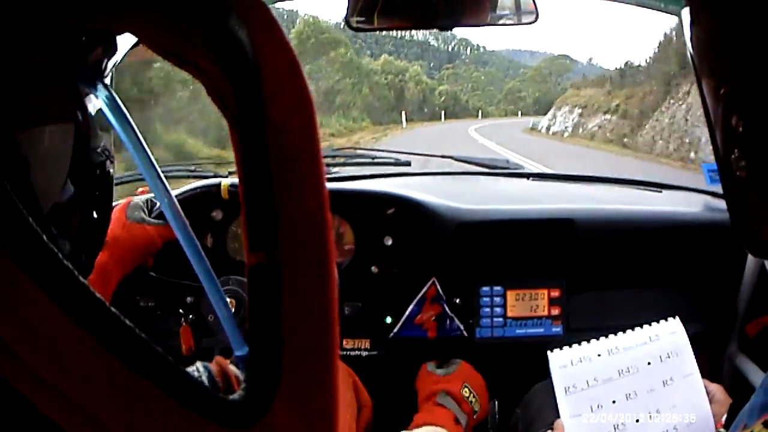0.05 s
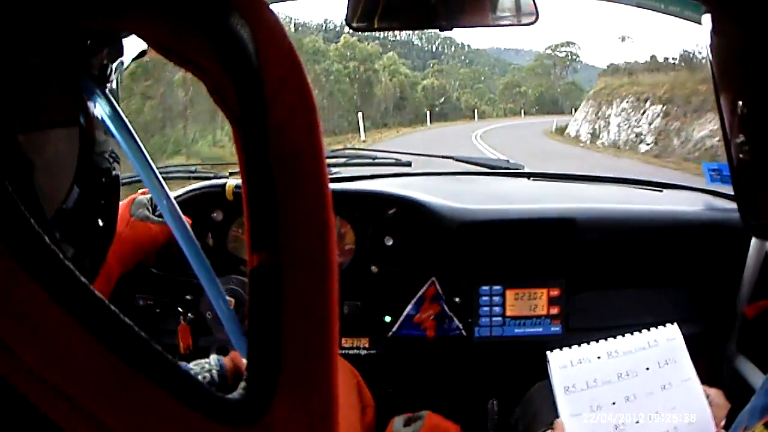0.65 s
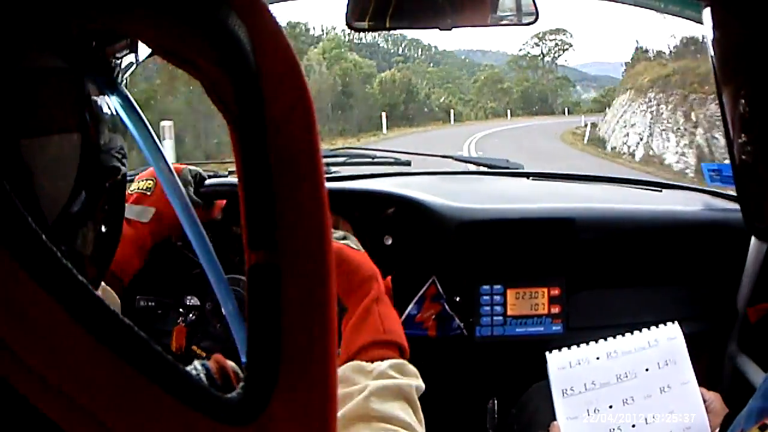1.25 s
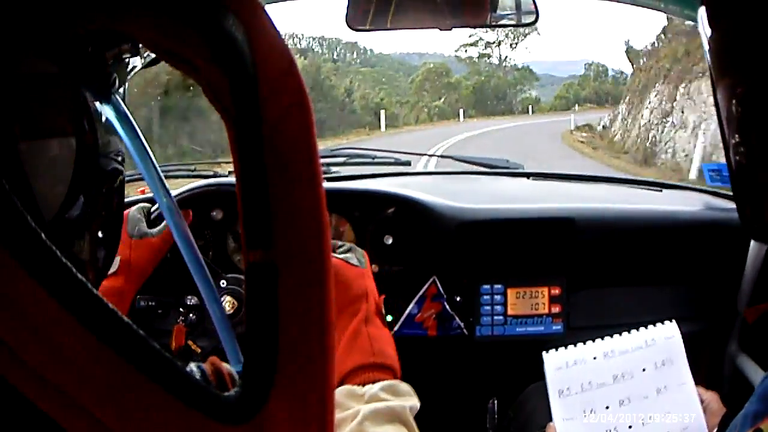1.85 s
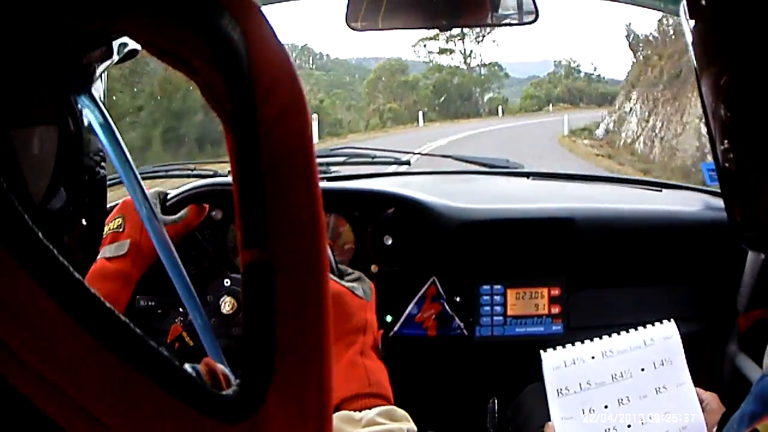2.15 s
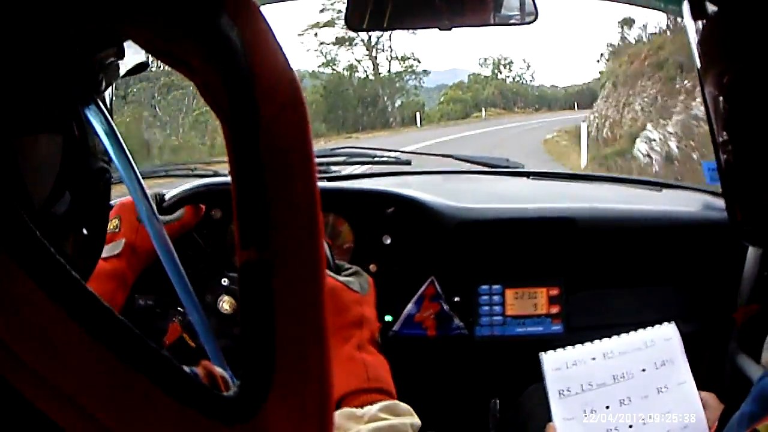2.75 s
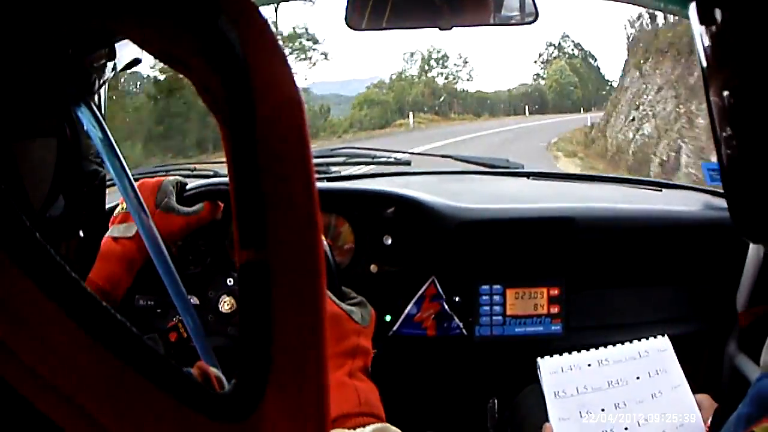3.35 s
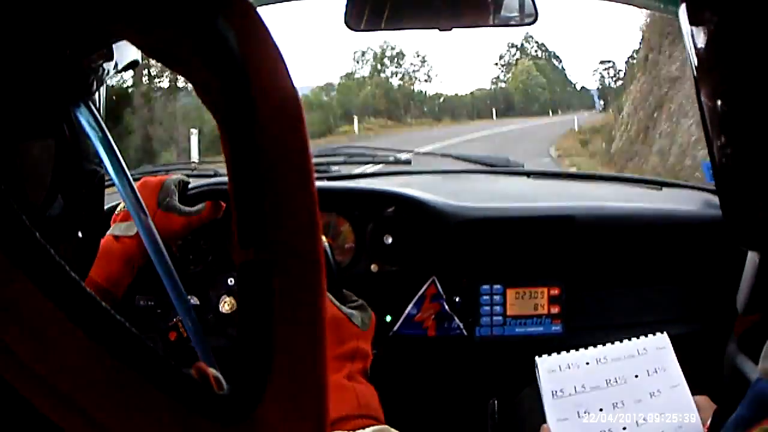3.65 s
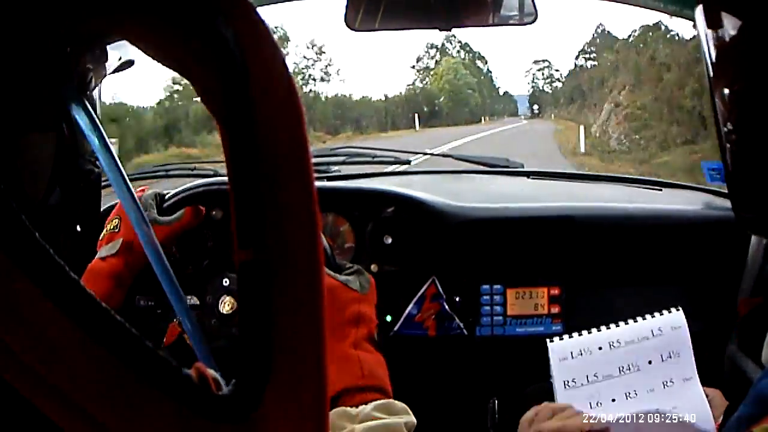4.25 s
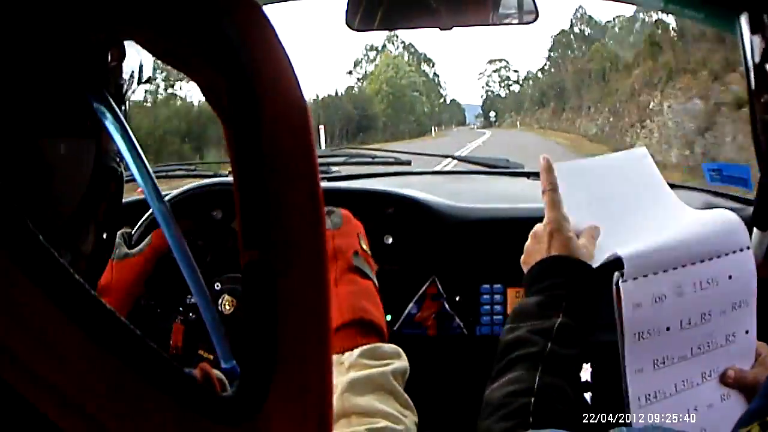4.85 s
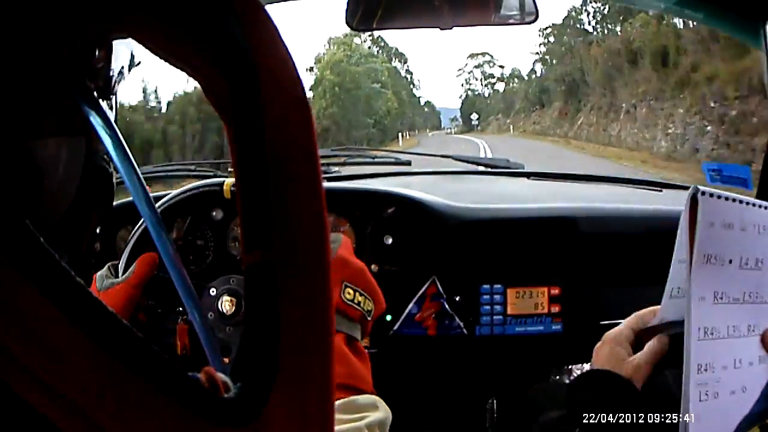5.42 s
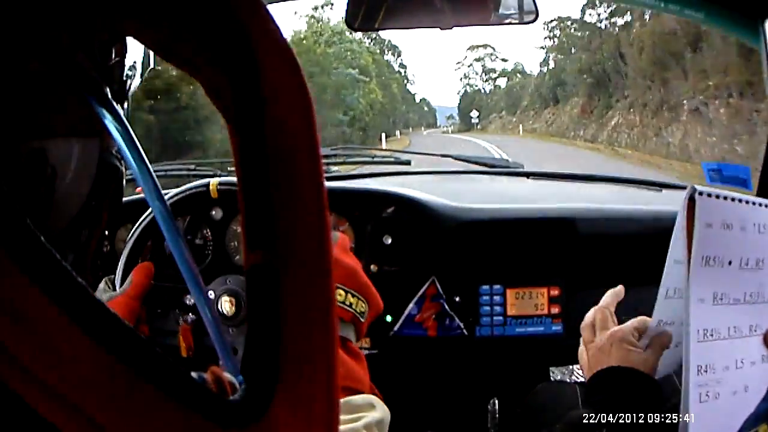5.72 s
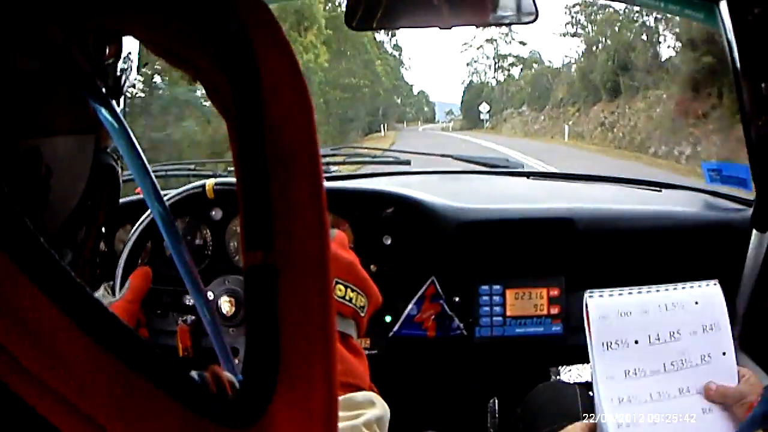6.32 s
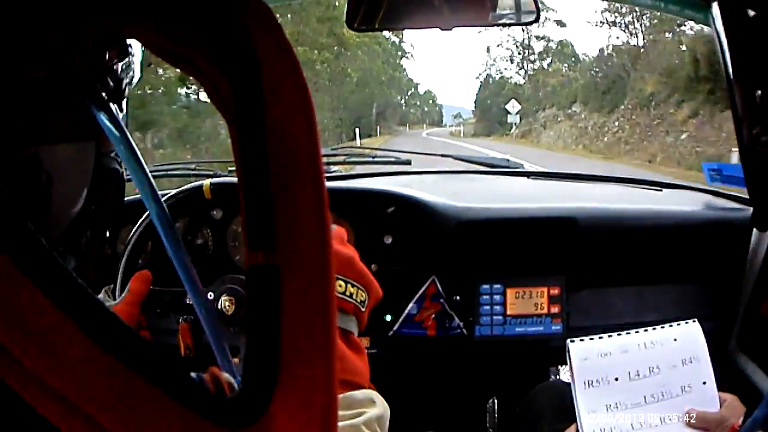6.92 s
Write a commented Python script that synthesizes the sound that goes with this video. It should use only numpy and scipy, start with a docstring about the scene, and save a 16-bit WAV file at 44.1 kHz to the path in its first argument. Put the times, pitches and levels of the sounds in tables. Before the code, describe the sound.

Wind buffets an overloaded microphone in rasping gusts and pops over the dull drone of a rally car, heard from inside.

```python
"""Short rasping gusts and lone pops sputter as buffeting air overloads a small camera's microphone.
Its diaphragm saturates, swinging from stop to stop, and turbulence crackles on each swing.
Between the gusts, low and dull, comes the cabin of a flat-six rally car pulling at speed:
two cylinder banks fire in turn to make a drone, something loose rattles, and the road rumbles."""
import sys
import numpy as np
from scipy import signal
from scipy.fft import rfft, irfft
from scipy.io import wavfile

SR = 44100
rng = np.random.default_rng(int(sys.argv[2]) if len(sys.argv) > 2 else 0)


def wav_out(sig):
    """Save sig, one row per channel (or a flat mono array), as 16-bit PCM at SR to the path in sys.argv[1]."""
    wavfile.write(sys.argv[1], SR, np.round(np.clip(np.atleast_2d(sig).T, -1, 1) * 32767).astype(np.int16))


N = 307818
T = np.arange(N) / SR

# The strongest gusts. Each row: start in seconds, length in seconds, strength in dB.
STRONG_GUSTS = [(0.001, 0.17, -19.5), (0.25, 0.034, -20.5), (0.299, 0.064, -19.5), (0.703, 0.014, -25.5),
                (0.83, 0.037, -23), (0.923, 0.03135, -18.5), (0.964, 0.024, -19.5), (1.026, 0.023, -18.5),
                (1.099, 0.0564, -28.5), (1.265, 0.0667, -19.5), (1.393, 0.046, -19.5), (1.65, 0.05, -21),
                (1.78, 0.021, -18.5), (1.873, 0.05, -20.5), (1.933, 0.035, -19), (2.108, 0.029, -19),
                (2.172, 0.028, -25), (2.227, 0.034, -20), (2.334, 0.03, -20), (2.518, 0.03196, -20),
                (2.657, 0.0718, -23), (2.774, 0.089, -20.5), (2.896, 0.084, -20.5), (3.001, 0.052, -24.5),
                (3.157, 0.018, -21.5), (3.198, 0.035, -23), (3.316, 0.049, -16.5), (3.377, 0.0951, -20.5),
                (3.534, 0.039, -20), (3.808, 0.01485, -19), (3.838, 0.025, -19), (3.87, 0.023, -18.5),
                (3.916, 0.044, -19), (3.988, 0.022, -24.5), (4.045, 0.024, -19.5), (4.126, 0.039, -19.5),
                (4.22, 0.06, -20.5), (4.419, 0.043, -23.5), (4.487, 0.072, -20.5), (4.606, 0.038, -22.5),
                (4.649, 0.025, -20), (4.736, 0.038, -20.5), (4.791, 0.026, -21), (4.864, 0.04, -23),
                (4.943, 0.029, -21.5), (5.073, 0.051, -22), (5.145, 0.031, -24.5), (5.204, 0.035, -27),
                (5.385, 0.03, -17.5), (5.455, 0.17, -19.5), (5.673, 0.021, -20), (5.705, 0.066, -21),
                (5.911, 0.045, -23), (6.096, 0.023, -22), (6.177, 0.029, -19), (6.303, 0.057, -23.5),
                (6.38, 0.064, -19), (6.583, 0.026, -21), (6.62, 0.083, -23.5), (6.727, 0.025, -21.5)]
# Spectra of the air's flutter and its turbulent rasp and hiss. Each row: frequency in Hz, level in dB.
FLUTTER_SPECTRUM = [(25, -3.5), (60, -3.5), (110, 1), (175, -4), (225, 0.5), (350, -6.5), (800, -19.5)]
RASP_SPECTRUM = [(200, -21), (400, -0.5), (650, 3.5), (1000, 3.5), (1200, -1), (1500, -2.5), (2000, -10.5),
                 (3000, -26.5), (5000, -43.5), (11000, -62)]
HISS_SPECTRUM = [(1200, -1), (2500, 9), (3500, 4), (5000, 1), (6500, 2), (8500, -0.5), (11000, -4.5)]


def gusts(pressure, rows, knee=0.53, knee_width=0.1443, ceiling_db=-6, cusp_db=-6,
          rasp_db=-3.5, hiss_db=-16, clump_db=6):
    """Saturation: gusts drive the diaphragm to its stops. Returns its swing and the turbulence on it."""
    spans = [(stretch(start, length), db) for start, length, db in rows]
    flutter, rasp, hiss = noise(FLUTTER_SPECTRUM), noise(RASP_SPECTRUM), noise(HISS_SPECTRUM)
    air, turbulence = np.zeros((2, N))
    for span, strength_db in spans:
        flutter_db = -2.5 + 0.77 * (strength_db + 22)  # stronger gusts flutter more
        air[span] = unit(pressure[span] + undb(flutter_db) * flutter[span])
    air = smooth(air, 0.0034)
    # weak pushes hardly move the diaphragm; it peaks at the knee, and stronger ones pin it a little lower
    pinned = np.tanh((air / knee) ** 3)
    cusp = pinned * np.exp(-np.abs(np.abs(air) - knee) / knee_width)
    swing = smooth(undb(ceiling_db) * pinned + undb(cusp_db) * cusp, 0.0012)
    # turbulence crackles in clumps: hardest at the cusps, faint on the way across
    blowing = smooth(during(rows) * 1., 0.00034)
    clumps = undb(clump_db * walk(0.0062)) * (0.1 + pinned ** 2 + 3 * np.abs(cusp)) * blowing
    hiss_gain = undb(hiss_db + 1.5 * walk(.03))
    for span, strength_db in spans:
        rasping = undb(rasp_db) * unit(clumps[span] * rasp[span])
        hissing = hiss_gain[span] * unit(clumps[span] * hiss[span])
        turbulence[span] = undb(strength_db) * (rasping + hissing)
    return swing, turbulence


# The hardest pops. Each row: time in seconds, relative level of the crack in dB.
HARD_POPS = [(0.206, -14), (0.38, -12), (0.589, -18), (0.708, -6.5), (0.902, -11.5), (1.035, -8),
             (1.061, -10), (1.193, -12.5), (1.289, -6), (1.46, -9.5), (1.594, -10.5), (1.724, -15.5),
             (1.884, -11), (2.116, -15), (2.237, -9), (2.519, -8), (2.572, -8), (2.63, -14), (2.903, -10.5),
             (3.08, -16), (3.16, -9), (3.279, -7.5), (3.316, -3.5), (3.507, -13), (3.582, -11),
             (3.676, -10.5), (3.746, -15.5), (3.811, -15), (3.922, -13), (3.989, -8.5), (4.045, -25.5),
             (4.373, -11), (4.605, -11), (4.708, -12.5), (4.813, -11), (5.003, -10), (5.27, -18.5),
             (5.335, -10.5), (5.891, -10), (5.982, -14), (6.071, -15.5), (6.312, -11)]


def pops(swing, pressure, lesser_pops, peak_db=-2, rasp_db=-9, hiss_db=-22, rise=0.47, fall=0.76):
    """Impulsive overload: jolts pull the diaphragm the way the air leans. Returns swing plus cracks."""
    swing, cracks = swing.copy(), np.zeros(N)
    rasp, hiss = noise(RASP_SPECTRUM), noise(HISS_SPECTRUM)
    for at, crack_db in [(at, db - 6.5) for at, db in HARD_POPS] + lesser_pops:
        scatter = np.exp(0.27 * rng.standard_normal())
        width_ms = 1.73 * 0.69 ** ((crack_db + 30) / 20) * scatter  # harder pops are shorter
        centre = int(np.clip(at * SR, 0, N - 1))
        span = slice(max(centre - 400, 0), centre + 400)
        ms = (T[span] - at) * 1000
        flank_ms = max(width_ms, .3) * np.where(ms < 0, rise, fall)
        pull = np.exp(-(np.abs(ms) / flank_ms) ** 2.03)
        peak = np.sign(pressure[centre]) * undb(peak_db)
        swing[span] += pull * (peak - swing[span])
        burst = np.exp(-np.abs(ms) / (0.77 + 0.34 * width_ms))
        cracks[span] += undb(crack_db + rasp_db) * unit(burst * rasp[span])
        cracks[span] += undb(0.93 * crack_db + hiss_db) * unit(burst * hiss[span])
    return swing + cracks


# The longest lulls, when the air lets go of the diaphragm. Each row: start in seconds, length in seconds.
AIR_LULLS = [(0.215, 0.03), (0.53, 0.036), (0.636, 0.027), (0.775, 0.037), (0.867, 0.031), (0.99, 0.036),
             (1.237, 0.027), (1.85, 0.026), (2.08, 0.028), (2.143, 0.03), (2.599, 0.03), (2.728, 0.036),
             (2.863, 0.034), (3.097, 0.03), (3.234, 0.027), (3.645, 0.029), (4.011, 0.031), (4.287, 0.035),
             (4.344, 0.028), (4.389, 0.029), (4.577, 0.026), (4.671, 0.029), (5.177, 0.028), (5.235, 0.033),
             (6.037, 0.029), (6.119, 0.027)]
# Strength of the chance jolts. Each row: time in seconds, relative level in dB.
JOLT_STRENGTH = [(0, 9.5), (.55, -5.5), (1.1, 4), (2, -3), (2.9, 4.5), (3.6, 1), (4.5, 4), (5.2, 1.5),
                 (5.7, 4.5), (6.3, 2.5), (6.98, -2)]


def sputter(jolts_per_s=68, unevenness=.31, puff_share=.42, in_gust_share=.3, edge_s=.003, rest_s=.004,
            puff_db=-24, pop_db=-24, gust_pop_db=-22.5, puff_spread_db=2.5, pop_spread_db=5):
    """Intermittency: air jolts unevenly. Returns puffs (start, length, dB) and lesser pops (time, dB)."""
    calm, gusty = during(AIR_LULLS), during(STRONG_GUSTS)
    # a hard pop outside a gust drags a short puff with it
    puffs = [(at - edge_s / 2, .009, db - 8.5) for at, db in HARD_POPS if not gusty[int(at * SR)]]
    taken = during([(start - rest_s, length + 2 * rest_s) for start, length, _ in [*puffs, *STRONG_GUSTS]])
    # the air pops as it lets go before a lull, and again as it catches
    edges = [at for start, length in AIR_LULLS for at in (start - edge_s, start + length + edge_s)
             if not taken[int(at * SR)]]
    lesser_pops = [(at, pop_db) for at in edges]
    # the diaphragm snaps back as a gust ends
    lesser_pops += [(start + length - edge_s / 2, db - 5) for start, length, db in STRONG_GUSTS]
    taken |= calm | during([(at - rest_s, 2 * rest_s) for at in edges])
    resting = during([(at - .012, .012) for at, _ in HARD_POPS])  # no jolt just before a hard pop
    draws = zip(rng.standard_normal((600, 2)), rng.random((600, 2)))
    for k, ((shift, size), (kind, duration)) in enumerate(draws):
        at = (k + unevenness * shift) / jolts_per_s
        length = 0.00861 * (.5 + duration)
        start = at - length / 2
        if start < 0 or start + length > T[-1] or resting[stretch(start, length)].any():
            continue
        level_db = np.interp(at, *np.transpose(JOLT_STRENGTH))
        if gusty[int(at * SR)] and kind < in_gust_share:
            lesser_pops.append((at, level_db + gust_pop_db + pop_spread_db * size))
        elif taken[int(at * SR)]:
            continue
        elif kind < puff_share:
            puffs.append((start, length, level_db + puff_db + puff_spread_db * size))
        else:
            lesser_pops.append((at, level_db + pop_db + pop_spread_db * size))
    return puffs, lesser_pops


# Spectrum of the slow buffeting. Each row: frequency in Hz, level in dB.
BUFFET_SPECTRUM = [(5, -13.5), (15, -10.5), (26, 1), (32, 0), (42, -6.5), (70, -24), (200, -41.5)]


def cabin_pressure(boom):
    """Superposition: the cabin air heaves with the buffeting and with the boom of the exhaust."""
    return noise(BUFFET_SPECTRUM) + undb(-3) * boom


# The engine's pull. Each row: time in seconds, firing rate of one bank in Hz, effort in dB.
ENGINE_PULL = [(0, 77.36, -8.5), (.7, 77.34, -14.5), (1.2, 77.63, -4), (1.9, 76, -4), (2.6, 76.35, -11.5),
               (3.101, 77.13, -7.5), (3.601, 77.1, -7), (4.4, 79.58, -8.5), (4.799, 81.05, -1),
               (5.25, 82.7, -5.5), (5.55, 83.8, 1.5), (6.049, 85.16, -5.5), (6.3, 86.52, 2.5),
               (6.98, 90.17, 7)]
# Transmission of the engine into the cabin. Each row: frequency in Hz, gain in dB.
CABIN_RESPONSE = [(110, -5), (160, 17.5), (250, -14.5), (400, 0), (600, -22), (1000, -18.5), (2000, -31),
                  (5000, -37.5)]


def engine(roughness=0.24, far_bank_gain=0.59, cabin_decay_s=0.0055):
    """Periodic excitation: two banks fire in turn. Returns their growl in the cabin and the deep boom."""
    times, bank_hz, effort_db = np.transpose(ENGINE_PULL)
    effort = undb(np.interp(T, times, effort_db))
    rate_hz = np.interp(T, times, bank_hz) * (1 + 0.003024 * walk(0.0802))
    cycles = np.cumsum(rate_hz) / SR
    firing = np.floor(2 * cycles)
    bank_gain = np.where(firing % 2, far_bank_gain, 1)
    pulses = np.diff(firing, prepend=0) * bank_gain * (1 + roughness * walk(0.002))
    # close reflections run the firings together
    reflections = rng.standard_normal(N) * np.exp(-T / cabin_decay_s)
    growl = colour(irfft(rfft(pulses) * rfft(reflections), N), CABIN_RESPONSE)
    return np.sqrt(effort) * growl, effort * np.cos(2 * np.pi * cycles)


# Brief rattles. Each row: time of the peak in seconds, half-width in seconds, level in dB.
RATTLE_BURSTS = [(0.315, 0.015, -20.5), (0.707, 0.0047, -24.5), (1.065, 0.0048, -28), (1.308, 0.016, -26.5),
                 (5.647, 0.0036, -22.5), (6.107, 0.00203, -35)]
# Resonances of the loose part. Each row: frequency in Hz, gain in dB.
RATTLE_RESONANCES = [(1800, 7), (2400, -4), (3200, 0), (3800, -7), (4400, -4), (5300, -5), (6100, -3),
                     (6700, -8.5), (8300, -9), (9100, -26), (10000, -5.5), (11000, -20.5)]


def rattles():
    """Impact excitation: dense little contacts of something loose drive its bright resonances."""
    shake = sum(undb(db) * np.exp(-((T - at) / width) ** 2) for at, width, db in RATTLE_BURSTS)
    contacts = rng.standard_normal(N) * np.abs(walk(0.00074))
    return shake * colour(contacts, RATTLE_RESONANCES)


# Spectrum of tyres and body on the road. Each row: frequency in Hz, level in dB.
ROAD_SPECTRUM = [(15, 21), (40, 7.5), (125, -18), (250, -19.5), (550, -20.5), (850, -32.5), (1500, -41),
                 (2200, -44.5), (3500, -52), (5000, -57), (6200, -54), (11000, -63)]


def road():
    """Random excitation: the road shakes tyres and body into a rumble whose level wanders slightly."""
    return undb(walk(0.42)) * noise(ROAD_SPECTRUM)


def undb(db):
    """Decibels to amplitude gain."""
    return 10 ** (np.asarray(db) / 20)


def unit(x):
    """Normalisation to rms 1."""
    return x / np.sqrt(np.mean(x ** 2) + 1e-18)


def colour(x, points):
    """Filtering by (Hz, dB) points, falling 40 dB a decade beyond them; rms 1."""
    hz, db = np.transpose(points)
    f = np.maximum(np.arange(N // 2 + 1) * SR / N, 1)
    skirt_db = -40 * np.log10(np.maximum(f / hz[-1], 1) * np.maximum(hz[0] / f, 1))
    gain = undb(np.interp(np.log(f), np.log(hz), db) + skirt_db)
    return unit(irfft(rfft(x) * gain, N))


def noise(points):
    """White noise filtered to the given spectrum."""
    return colour(rng.standard_normal(N), points)


def smooth(x, seconds):
    """Gaussian low-pass filtering rounds off changes quicker than the given time."""
    f = np.arange(N // 2 + 1) * SR / N
    return irfft(rfft(x) * np.exp(-(f * seconds) ** 2), N)


def walk(seconds):
    """Random fluctuation of rms 1 on the given time scale."""
    return unit(smooth(rng.standard_normal(N), seconds))


def stretch(start, length):
    """The samples of an interval given in seconds."""
    return slice(max(int(start * SR), 0), int((start + length) * SR))


def during(rows):
    """A gate, true inside each of the (start, length, ..) rows."""
    inside = np.zeros(N, bool)
    for start, length, *_ in rows:
        inside[stretch(start, length)] = True
    return inside


def scene():
    """Masking: the sputter of the overloaded microphone covers engine and road, which show in the gaps."""
    growl, boom = engine()
    drone = undb(-28.5) * boom + undb(-34) * growl
    rumble = undb(-22.5) * road()
    pressure = cabin_pressure(boom)
    puffs, lesser_pops = sputter()
    swing, turbulence = gusts(pressure, [*puffs, *STRONG_GUSTS])
    return (drone + rumble + rattles() + turbulence + pops(swing, pressure, lesser_pops))[None]


def record(dry, cutoff_hz=11050):
    """Clipping and band limiting: the camera clips at full scale and cuts the high treble."""
    low_pass = signal.ellip(10, .2, 80, cutoff_hz, fs=SR, output="sos")
    return signal.sosfilt(low_pass, np.clip(dry, -1, 1))


dry = scene()
out = record(dry)
wav_out(out)
```